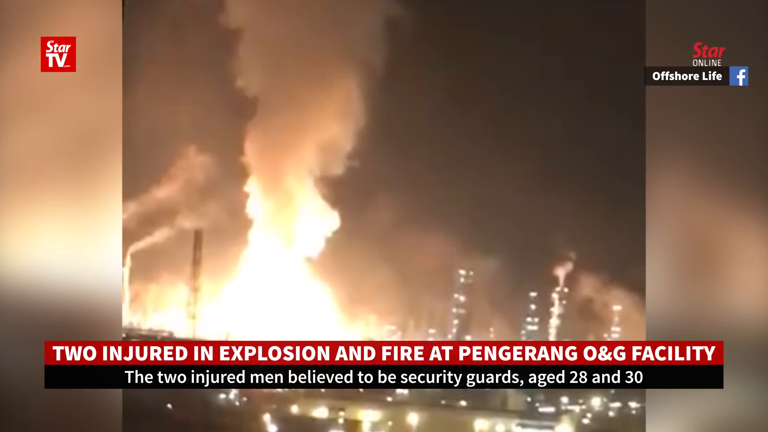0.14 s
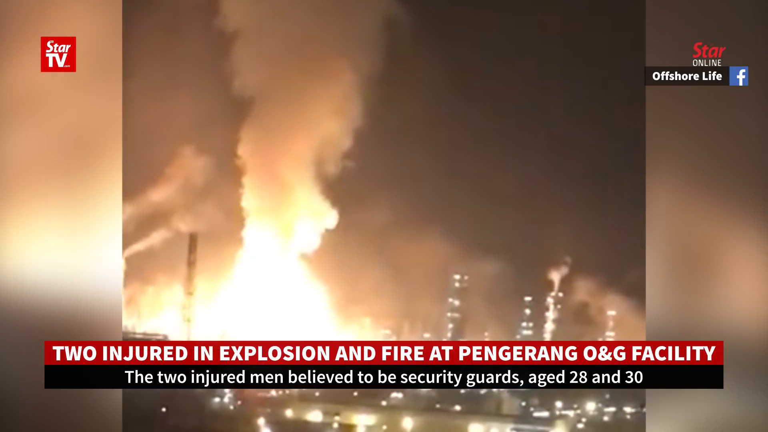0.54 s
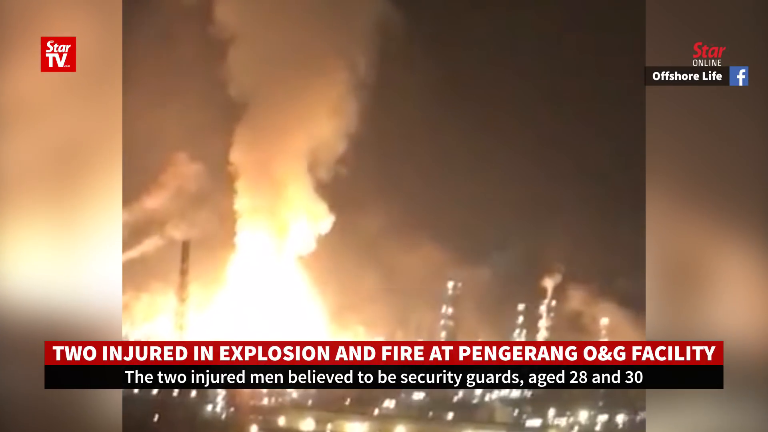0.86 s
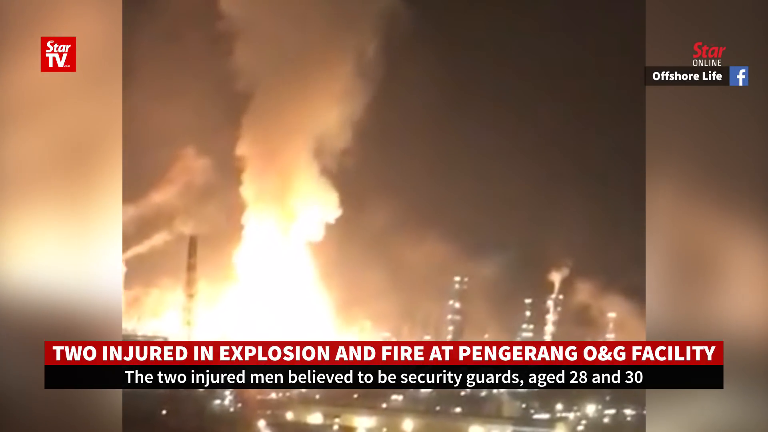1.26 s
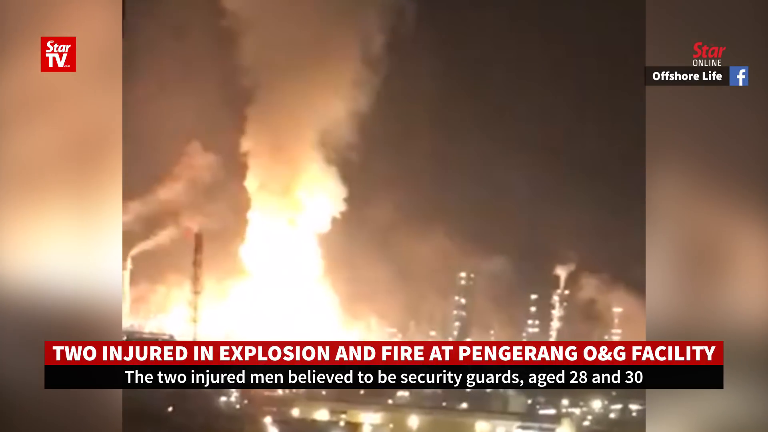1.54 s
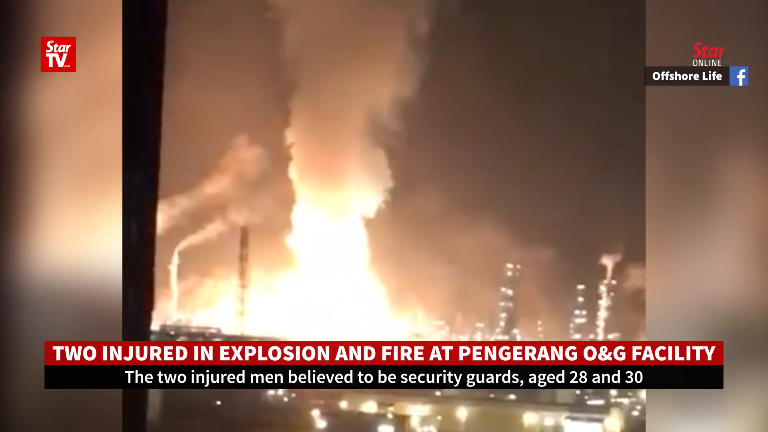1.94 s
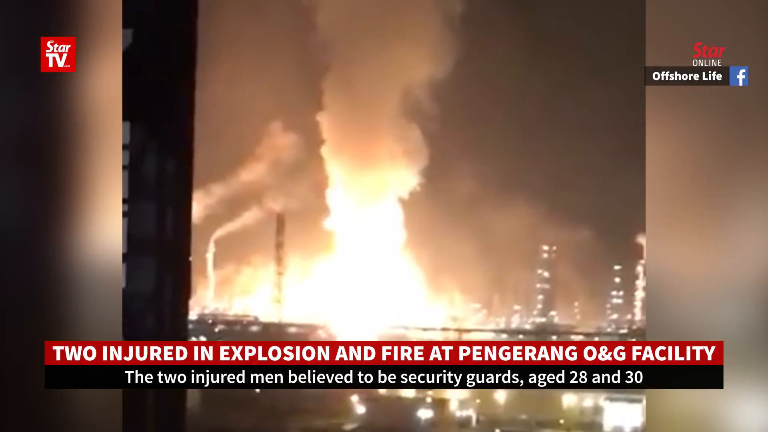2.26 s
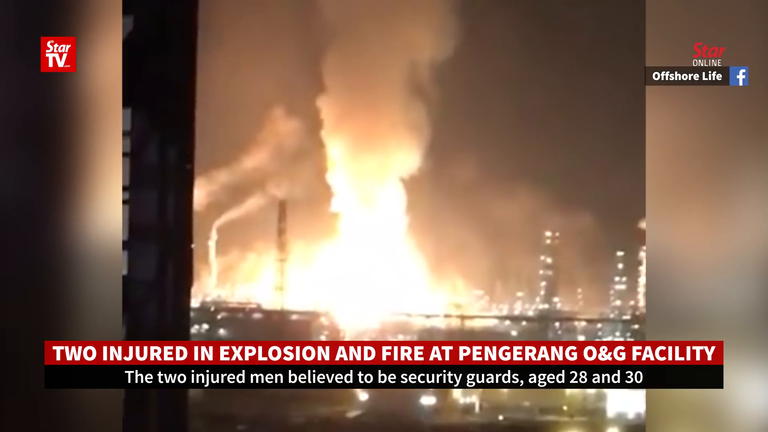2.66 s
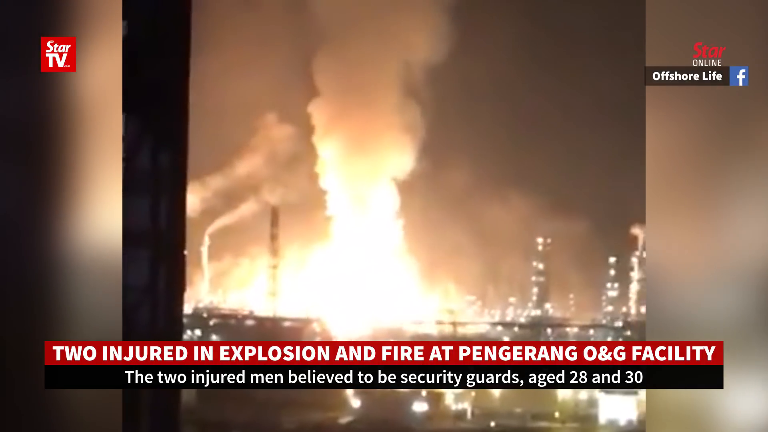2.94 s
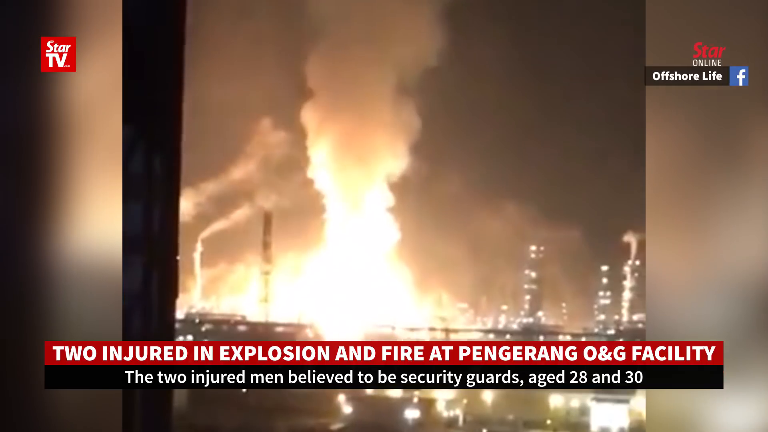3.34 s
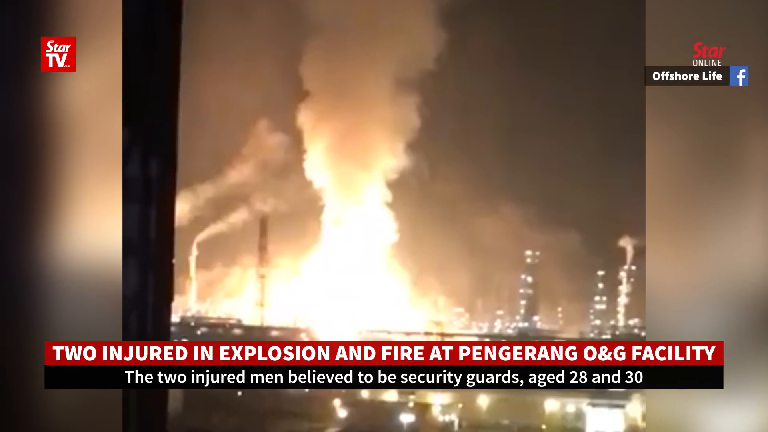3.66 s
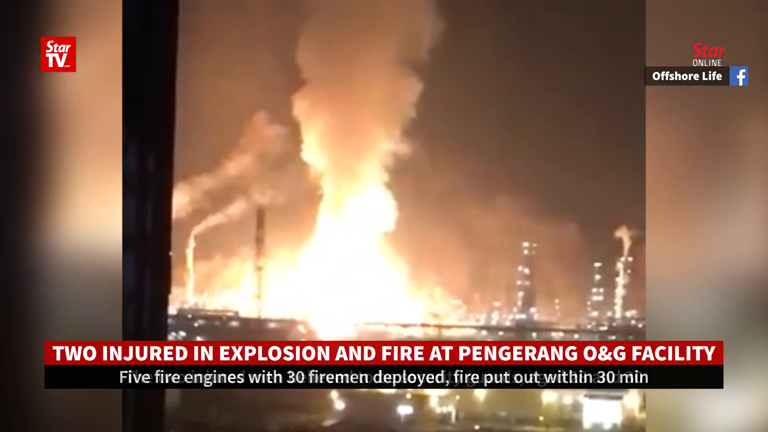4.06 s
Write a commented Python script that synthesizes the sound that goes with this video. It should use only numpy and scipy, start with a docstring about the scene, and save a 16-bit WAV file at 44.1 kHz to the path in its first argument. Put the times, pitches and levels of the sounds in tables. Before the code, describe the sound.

A huge gas fire at a plant roars far away at night, a steady dull rush with low rumbling flare-ups and a faint hum.

```python
"""Distant gas fire

A large gas fire at a plant, heard from far away through a phone: a rush dulled by the air, with flare-ups
of rumble, roar, billow and whoosh, and faint singing pipes and stacks.
The rush is coloured noise whose treble varies with the air on the way; flames, pipes and stacks are noise
through resonances, levelled to sound dense."""
import sys
import numpy as np
from scipy import signal
from scipy.fft import rfft, irfft, next_fast_len
from scipy.io import wavfile
from scipy.ndimage import uniform_filter1d

SR = 44100
rng = np.random.default_rng(int(sys.argv[2]) if len(sys.argv) > 2 else 0)


def transcribe(signal):
    """Save signal, clipped to [-1, 1], as a 16-bit WAV file at the path in sys.argv[1]."""
    frames = np.atleast_2d(signal).T
    limited = np.clip(frames, -1, 1)
    pcm = np.round(limited * 32767).astype(np.int16)
    wavfile.write(sys.argv[1], SR, pcm)


N = 185433


def undb(db):
    """Decibels to gain."""
    return 10 ** (np.asarray(db) / 20)


def curves(table):
    """Columns of a table, interpolated to one value per sample."""
    time_s, *columns = np.transpose(table)
    return [np.interp(np.arange(N) / SR, time_s, column) for column in columns]


def unit_rms(x):
    """Scale to rms 1."""
    return x / np.sqrt(np.mean(x ** 2))


def noise(gain_at):
    """Noise of rms 1 whose spectrum follows gain_at(Hz)."""
    size = next_fast_len(N)
    hz = np.maximum(np.arange(size // 2 + 1) * SR / size, 1)
    spectrum = rfft(rng.standard_normal(size)) * gain_at(hz)
    return unit_rms(irfft(spectrum, size)[:N])


def resonance(center_hz, width_hz):
    """Noise through one resonance, its upper skirt falling off more steeply."""
    def gain_at(hz):
        peak = 1 / (1 + ((hz - center_hz * center_hz / hz) / width_hz) ** 2)
        upper_skirt = 1 / (1 + (hz / center_hz / 2) ** 4)
        return peak * upper_skirt
    return noise(gain_at)


def dense(x, evenness):
    """Many small gusts at once: the envelope's deepest gaps and tallest peaks are levelled; rms 1."""
    envelope = np.abs(signal.hilbert(x, next_fast_len(N))[:N])
    return unit_rms(x / (envelope + 0.2) ** np.clip(evenness, 0, 1))


def walk(rate_hz):
    """Random levels held 1 / rate_hz and smoothed twice; spread near 1."""
    hold = int(SR / rate_hz)
    held = np.repeat(rng.standard_normal(N // hold + 1), hold)
    return uniform_filter1d(uniform_filter1d(held, hold), hold)[:N] * 4 / 3


def lift(rises, rise_s=0.011, fade_s=0.11):
    """Summed rises in dB over the calm level; each comes quickly and fades more slowly."""
    t = np.arange(N) / SR
    total_db = 0
    for start_s, length_s, lift_db in rises:
        rise = (t - start_s) / rise_s + .5
        fade = (start_s + length_s - t) / fade_s + .5
        total_db = total_db + lift_db * np.clip(np.minimum(rise, fade), 0, 1)
    return total_db


# fainter resonances of the pipes: [f/Hz, width/Hz, level/dB]
PIPE_MODES = [(319.5, 16, -41), (378, 57, -41.5), (417.7, 20, -39), (598, 23, -38.5), (2517, 140, -47)]


def pipes(waver_db=0.8, waver_hz=3.5):
    """Gas flow excites narrow resonances that waver slowly."""
    return sum(dense(resonance(hz, width_hz), .6) * undb(db + waver_db * walk(waver_hz))
               for hz, width_hz, db in PIPE_MODES)


# random waver of the hum, typed by time: [t/s, length/s, lift/dB]
HUM_WAVER = [(.38, 0.19, 7.5), (.9, 0.22, 6.5), (1.28, 0.18, 6.5), (1.55, 0.075, 8.5), (1.76, 0.4, 6),
             (2.65, 0.11, 8), (2.95, 0.2, 5.5), (3.29, 0.12, 8), (3.49, 0.11, 7.5), (3.66, 0.58, 2.5)]


def hum(hz=533.7, width_hz=26, calm_db=-36):
    """The clearest singing pipe: one narrow resonance that wavers by chance."""
    return dense(resonance(hz, width_hz), .7) * undb(calm_db + lift(HUM_WAVER))


# flare-ups: [t/s, length/s, lift/dB, eddy row (rounded; half to even; rows past the last are silent)]
FLARES = [(.1, 0.42, 6, 0), (.1, 0.14, 4.8, 1), (.5, 0.16, 4, 2.5), (.86, 0.21, 5.3, 1.5),
          (1.08, 0.18, 8.9, 2), (1.3, 0.16, 5.3, 2.5), (1.58, 0.11, 5.3, 1.5), (1.679, 0.33, 11.9, 1),
          (1.9, 0.41, 7.6, 0.5), (1.99, 0.11, 6.7, 2), (2.42, 0.6, 7.9, 0), (2.35, 0.13, 4.7, 0.5),
          (2.66, 0.12, 7, 1), (2.87, 0.088, 4, 1.5), (3.04, 0.11, 6.1, 2), (3.48, 0.07, 4, 1.5),
          (3.87, 0.11, 5.3, 1.5), (4.08, 0.2, 4.1, 1.5), (2.03, 0.17, 5, 1), (2.7, .09, 3.8, 1.5),
          (3.17, 0.16, 6.2, 1), (3.5, 0.087, 4.7, 1), (3.82, 0.29, 5, 0.5), (1.45, 0.2, 5, 4),
          (1.95, 0.14, 4.3, 3), (2.95, 0.22, 5, 3), (3.4, .4, 6.1, 2.5), (4.02, 0.2, 4.9, 3)]


def flare_lift(eddy):
    """Flare-ups of one eddy size, in dB over its calm level."""
    return lift([row[:-1] for row in FLARES if round(row[-1]) == eddy])


# resonances of the stacks: [f/Hz, width/Hz, calm level/dB]
STACK_MODES = [(175.4, 13, -39.5), (201, 20, -42.5), (257.4, 14, -42.5)]


def stacks(roar_eddy=1):
    """The roar rings the stacks, louder when it flares."""
    flare_db = flare_lift(roar_eddy)
    return sum(dense(resonance(hz, width_hz), .6) * undb(db + flare_db)
               for hz, width_hz, db in STACK_MODES)


# eddies of burning gas, largest first (rumble, roar, billow, whoosh): [f/Hz, width/Hz, calm level/dB]
EDDY_BANDS = [(71.5, 37, -41), (205, 92, -38), (332.4, 150, -33), (815, 69, -38.5)]


def flame(churn_db=1.0, churn_hz=8, evenness=.45):
    """Each eddy size sounds in its own band, churns, and flares up in its own time."""
    total = 0
    for eddy, (hz, width_hz, calm_db) in enumerate(EDDY_BANDS):
        level_db = calm_db + flare_lift(eddy) + churn_db * walk(churn_hz)
        total = total + dense(resonance(hz, width_hz), evenness) * undb(level_db)
    return total


def flutter_bands(treble, tilt_hz, flutter_db):
    """Split treble into half-octave steps above tilt_hz; each flutters alone."""
    size = next_fast_len(N)
    spectrum = rfft(treble, size)
    hz = np.linspace(1, SR / 2, len(spectrum))
    step = np.log2(hz / tilt_hz).clip(0, 2) * 2  # half octaves; end bands open outward
    total = 0
    for k in range(5):
        band = irfft(spectrum * np.clip(1 - abs(step - k), 0, 1), size)[:N]
        total = total + band * undb(flutter_db * walk(16))
    return total


# colour of the rush after its way through the air: [f/Hz, relative level/dB]
AIR_COLOUR = [(20, -57), (45, -24), (85, -10), (112, -9.5), (140, -4), (320, -5), (430, -5.5), (465, -7.5),
              (505, -6.5), (700, -7), (950, -6.5), (1090, -10), (1200, -9.5), (1500, -12), (2150, -14),
              (2350, -19.5), (2750, -21.5), (3200, -23.5), (3600, -30), (4250, -35), (4900, -44),
              (5500, -43.5), (6000, -49), (6800, -53), (7600, -64), (8800, -66.5), (12000, -79.5)]
# levels as the air on the way moves: [t/s, treble level/dB, upper roar level/dB]
AIR_LEVELS = [(0, -32.5, -28.5), (.2, -33.5, -30.5), (.5, -33, -32.5), (.75, -31.5, -31), (.95, -31, -29.5),
              (1.15, -32, -32), (1.35, -34.5, -32.5), (1.7, -33.5, -30.5), (2.05, -34.5, -33),
              (2.25, -34.5, -28), (2.5, -35, -33), (2.8, -35.5, -33), (3.15, -33, -32), (3.35, -33, -28),
              (3.7, -32.5, -30), (4.2, -32, -33.5)]
# broad resonance at the top of the roar: [f/Hz, width/Hz]
UPPER_MODE = (1289, 250)


def rush(tilt_hz=1700, flicker_db=0.6, flutter_db=0.97, body_db=-23, body_follows=0.3):
    """Turbulent burning; moving air on the way lets more or less treble through."""
    treble_db, upper_db = curves(AIR_LEVELS)
    swing_db = treble_db - treble_db.mean()
    colour_hz, colour_db = np.transpose(AIR_COLOUR)

    def colour(hz):
        return undb(np.interp(np.log(hz), np.log(colour_hz), colour_db))

    def low_share(hz):
        return 1 / (1 + (hz / tilt_hz) ** 4)

    body = noise(lambda hz: colour(hz) * np.sqrt(low_share(hz)))
    body_level_db = body_db + body_follows * swing_db + flicker_db * walk(6.14)  # dB per dB of treble
    treble = noise(lambda hz: colour(hz) * np.sqrt(1 - low_share(hz)))
    bands = flutter_bands(treble, tilt_hz, flutter_db)
    treble_level_db = treble_db + flicker_db * walk(12)
    upper = dense(resonance(*UPPER_MODE), 0.25)
    upper_level_db = upper_db + flicker_db * walk(3.8)
    return body * undb(body_level_db) + bands * undb(treble_level_db) + upper * undb(upper_level_db)


def scene():
    """All sources summed to one channel, from one far-off place."""
    return (pipes() + hum() + stacks() + flame() + rush())[None]


def record(dry, bass_cut_hz=19, top_hz=11950):
    """The phone loses the deepest bass and cuts the very top."""
    bass_cut = signal.butter(4, bass_cut_hz, "high", fs=SR, output="sos")
    top_cut = signal.ellip(12, .2, 60, top_hz, fs=SR, output="sos")  # ripple dB, stopband dB
    return signal.sosfilt(top_cut, signal.sosfilt(bass_cut, dry))


dry = scene()
out = record(dry)
transcribe(out)
```